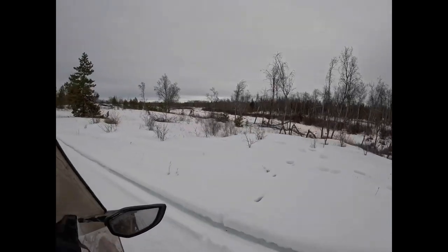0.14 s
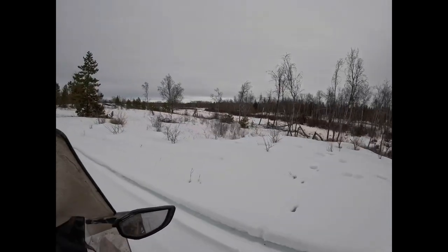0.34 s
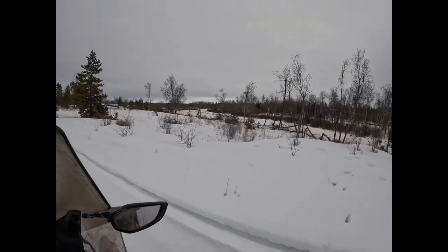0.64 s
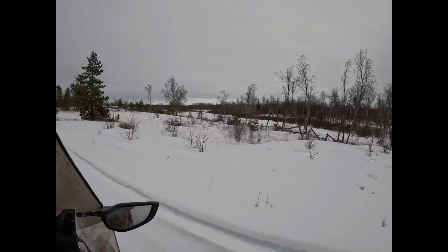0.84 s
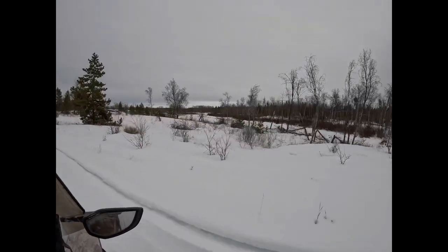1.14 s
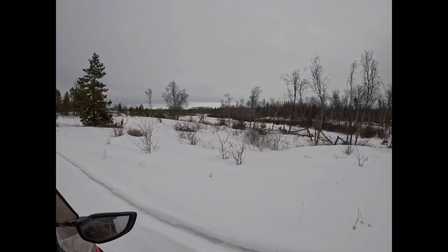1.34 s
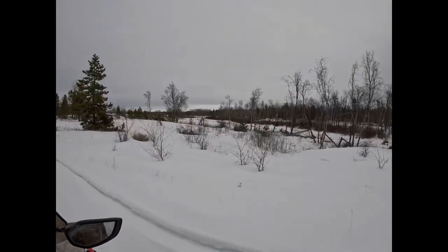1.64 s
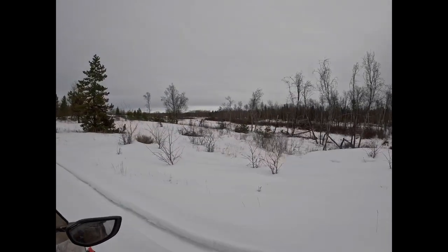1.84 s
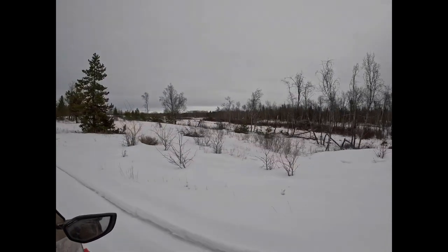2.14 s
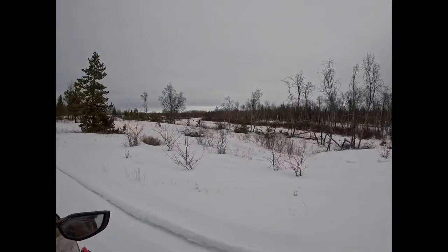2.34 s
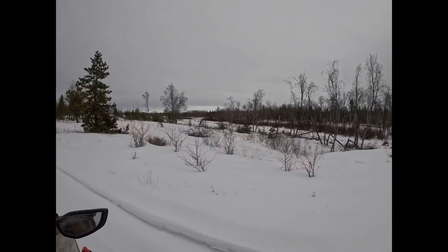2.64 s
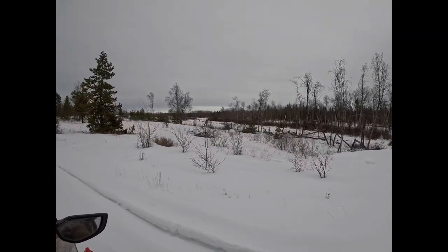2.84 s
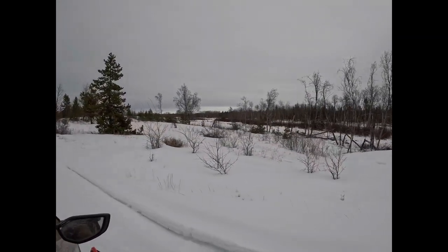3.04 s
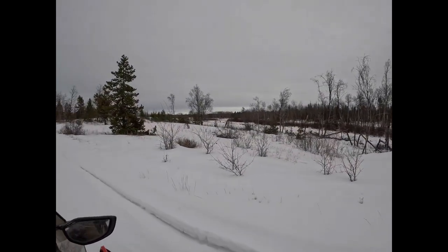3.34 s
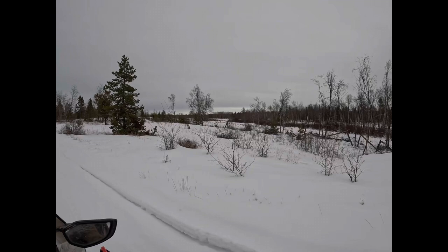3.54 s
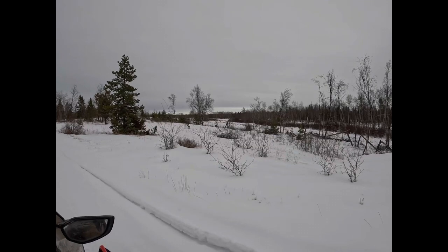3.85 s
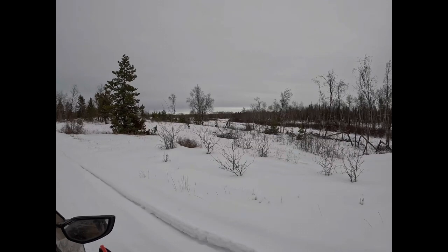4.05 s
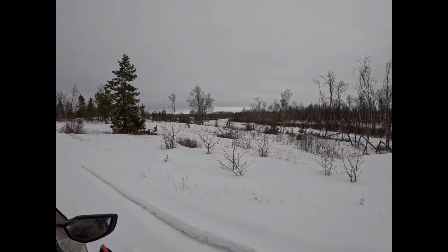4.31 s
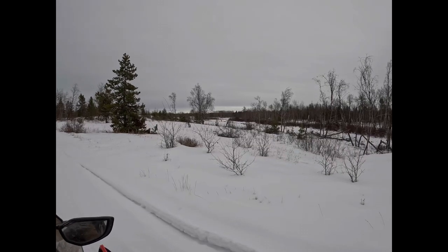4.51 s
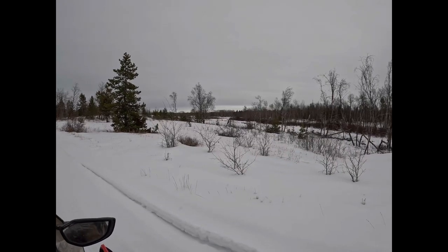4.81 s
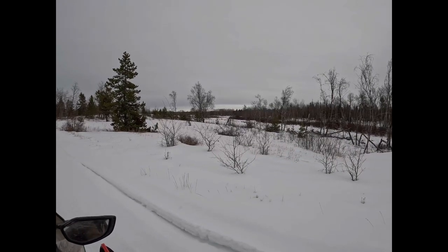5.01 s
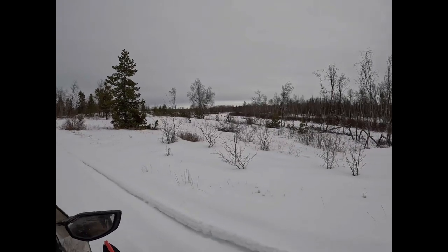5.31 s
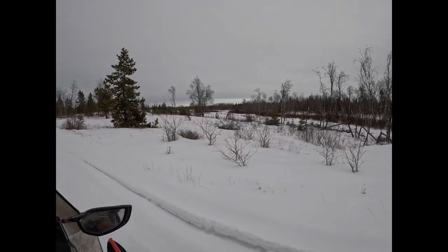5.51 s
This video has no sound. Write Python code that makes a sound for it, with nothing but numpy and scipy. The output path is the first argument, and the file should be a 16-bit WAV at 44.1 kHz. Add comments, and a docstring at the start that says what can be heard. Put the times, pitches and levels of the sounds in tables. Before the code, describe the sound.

A snowmobile pulls along a snowy trail, heard close from the seat in open air. Its buzzing, clattering engine rises slightly over the low rumble of the track, with faint belt squeals. The pitch then falls steadily to a lumpy, rattling idle. A switch snaps sharply and the engine runs down in ever slower thumps, with loose knocks, a few thin clinks and a last soft rustle.

```python
"""On a snowy trail, from the seat of a snowmobile: it pulls along, eases off and settles to idle.
The exhaust drones through the pipe's resonances, the engine clatters once a firing, the belt squeals
on the clutch and the track rumbles over the snow. The stop switch snaps and the engine runs down
in ever slower thumps, with loose knocks, a few thin clinks and a last short rustle."""
import sys
import numpy as np
from scipy import signal
from scipy.fft import rfft, irfft
from scipy.io import wavfile
from scipy.ndimage import uniform_filter1d

SR = 44100
rng = np.random.default_rng(int(sys.argv[2]) if len(sys.argv) > 2 else 0)


def wrap_up_sound(samples):
    """Save the sound to the file named by the first command line argument, as 16-bit audio."""
    columns = np.atleast_2d(samples).T
    # keep every value between -1 and 1, then stretch to whole-number steps
    tamed = np.clip(columns, -1, 1)
    steps = np.round(tamed * 32767).astype(np.int16)
    wavfile.write(sys.argv[1], SR, steps)


N = 250047
TIME = np.arange(N) / SR
IDLE_RATE, ENGAGE_RATE = 34, 56.5  # firings per s: the belt hangs slack; the belt grips
STOP_S, COAST_S = 4.7866, 4.838  # the stop switch snaps; the first unfired stroke
# cowl resonances: (centre [Hz], width [Hz], lift [dB])
COWL_MODES = [(1330, 97, 1.5), (1690, 150, 2.5), (2506, 180, -4), (3440, 190, 5), (4000, 620, 2.5)]


def exhaust(rate, firings, flutter_per_s=45, fade_db_per_s=52.5, hold_s=.033):
    """Orders of the firing rate slide through pipe resonances; unequal cylinders add half orders."""
    # pipe and air box resonances: (centre [Hz], width [Hz], throttle shut [dB], throttle open [dB])
    pipe = [(70, 35.4, -20, -49), (110, 24, -22.5, -30.5), (146, 28, -34.5, -42), (172, 15.4, -43, -17),
            (204.5, 38, -37.5, -31.5), (285.8, 45.5, -32, -28.5), (324, 26, -37, -24.5),
            (395, 66, -37.5, -39.5), (456, 52.4, -40, -26), (579.6, 49.7, -63, -43),
            (635, 45, -63.5, -35.5), (788, 110, -65, -50), (934, 55, -58, -40.5), (1051, 38, -70.5, -34),
            (1270, 190, -75, -39), (1446, 58, -79, -39), (1715, 140, -74, -46.5), (2215, 130, -81, -49),
            (2400, 110, -81, -55), (2860, 400, -76, -58), (3400, 300, -78, -59)]
    # low orders of the exhaust pulse: (order [x firing rate], throttle shut [dB], throttle open [dB])
    pulse_orders = [(1.5, -12.5, -4.5), (2.0, 1, -4.5), (2.5, -31.5, 6), (3.0, 4.5, -3.5), (3.5, -7.5, -8),
                    (4.0, -4, 5), (4.5, -14, 0.5), (5.0, 0, -1), (5.5, -11, -23), (6.0, -1, 3.7),
                    (6.5, -23.5, 0.5), (7.0, 2.7, 7.5), (7.5, -32.5, -8), (8.0, 4, 5), (8.5, -30, 2),
                    (9.0, 3, 6), (9.5, -19, -5.5), (10.0, 1.5, -5)]
    # the seventh order sings out as the revs fall: (time [s], half length [s], added share [dB])
    singing = [(2.13, 0.12, -3.5)]
    t = TIME[::100]  # control rate
    throttle, rate = opening(t), np.interp(t, TIME, rate)
    centre, width, shut_db, open_db = np.array(pipe).T[:, :, None]
    trim_db = -.28 - 1.4 * throttle
    peaks = from_db(shut_db + throttle * (open_db - shut_db) + trim_db)
    pulse_db = {order: shut + throttle * (wide - shut) for order, shut, wide in pulse_orders}
    buzz_db, half_order_db = 4.5 * throttle, -17.5 + 5 * throttle
    fade_db = fade_db_per_s * np.maximum(t - COAST_S - hold_s, 0)
    rough = .1 + .22 * np.sin(np.pi * throttle)  # combustion is least even at half throttle
    out = np.zeros((2, N))
    for order in np.r_[.5, np.arange(1.5, 30, .5)]:
        hz = order * rate
        response = 1 / (1 + 1j * (hz ** 2 - centre ** 2) / (hz * width))
        order_db = pulse_db.get(order, buzz_db * (order > 10) + half_order_db * (order % 1 > 0))
        gain = np.linalg.norm(peaks * np.abs(response) ** 2, axis=0) * from_db(order_db)
        if order == 7:
            gain *= 1 + np.interp(t, TIME, swells(singing))
        gain *= from_db(-fade_db * (1 + (hz / 450) ** 4))  # coasting, the highs fade faster
        gain *= 1 - (1 - burning(t)) / (1 + (hz / 100) ** 10)  # the bass dies with the ignition
        # uneven combustion shakes each order in strength and timing
        gain *= 1 + rough * drift(flutter_per_s, t)
        lag = np.angle(response).sum(axis=0) + rough * drift(flutter_per_s, t)
        tone = np.sqrt(2) * np.cos(2 * np.pi * order * firings + np.interp(TIME, t, lag))
        out += tone * np.array([np.interp(TIME, t, gain * side) for side in pan(hz)])
    return out


def boom(rate, firings, box_hz=69.5, width_hz=20.7, box_db=-16):
    """The firing tone swells under throttle and at idle, and booms through the air box resonance."""
    firing_db = -31 + 10.5 * opening() + 7.5 * belt_slack(rate)
    air_box = from_db(box_db) / (1 + (2 * (rate - box_hz) / width_hz) ** 2)
    return burning() * (from_db(firing_db) + air_box) * np.sqrt(2) * np.cos(2 * np.pi * firings)


def clatter(rate, firings, split_hz=3700, scatter_db=1.47):
    """Pistons and valves shake the cowl once a firing, one cylinder harder than the other."""
    # clatter colour under load: (frequency [Hz], level [dB])
    loaded = [(320, -32), (530, -0.5), (649, -5.5), (867, -5.5), (1070, -3), (1110, -1.5), (1460, -6.5),
              (1590, -18), (1950, -7), (2100, -12.5), (2500, -14.5), (3440, -21), (5570, -26.5),
              (7640, -27), (12600, -46.5), (14800, -54)]
    # clatter colour at idle: (frequency [Hz], level [dB])
    idle = [(320, -39), (550, 0.5), (830, -2), (1170, -0.5), (1290, -4), (1500, -3), (1880, -10.5),
            (2010, -6), (2180, -12), (2540, -7), (3120, -15), (4780, -16.5), (5490, -20.5), (7800, -23),
            (8200, -28), (12400, -37), (14800, -63)]
    throttle, octaves = opening(), np.log2(rate / IDLE_RATE)
    unloaded_db = -2.5 * belt_slack(rate) - 4 * (1 - burning())
    body_db = -41 + 2 * octaves + 8 * throttle ** 2 + unloaded_db
    treble_db = -56.5 + 1.5 * np.minimum(octaves, 0) + 14 * throttle ** 2 + unloaded_db
    hiss = np.sqrt(throttle) * noise(loaded, COWL_MODES)
    hiss += np.sqrt(1 - throttle) * noise(idle, COWL_MODES)
    body = signal.sosfiltfilt(signal.butter(4, split_hz, fs=SR, output="sos"), hiss)
    treble = hiss - body
    turn = 2 * np.pi * (firings + .21)
    beat = rms_one(np.exp(.12 * np.cos(turn)) * (1 + .038 * np.cos(turn / 2)))
    depth = np.clip(.11 + np.maximum(1 - rate / IDLE_RATE, 0), 0, 1)  # slow strokes throb more
    throb = rms_one((1 - depth + depth * beat) * from_db(scatter_db * drift(160)))
    rattle = from_db(body_db) * rms_one(body) + from_db(treble_db) * rms_one(treble)
    return throb * compression(rate) * rattle


def firing_rate(coast_rate=40.3, decay_s=.335):
    """Strokes per second; without ignition, friction slows the crank exponentially."""
    # revs under ignition: (time [s], rate [firings/s])
    revs = [(0, 106.78), (0.12, 106.93), (0.34, 107.28), (0.51, 114.2), (0.69, 118.43), (0.88, 116.37),
            (1, 113.02), (1.15, 96.44), (1.31, 90.04), (1.48, 86.08), (1.62, 81.58), (1.75, 76.92),
            (1.88, 71.34), (2.05, 67.77), (2.17, 66.13), (2.3, 59.93), (2.43, 56.89), (2.6, 51.84),
            (2.79, 46.32), (2.98, 44.15), (3.14, 41.81), (3.5, 41.78), (3.77, 40.14), (4.28, 41.82),
            (4.6, 41.61), (4.8, 41.21)]
    coasting = coast_rate * np.exp((COAST_S - TIME) / decay_s)
    return np.where(TIME < COAST_S, in_time(revs), coasting)


def crank(rate, waver_per_s=14):
    """Running count of firings; the crank wavers early and late, most at half throttle."""
    firings = np.cumsum(rate) / SR
    depth = .008 + .025 * np.sin(np.pi * opening())
    waver = depth * uniform_filter1d(drift(waver_per_s), SR // 25)
    # the first unfired stroke falls on a half count
    return firings - np.interp(COAST_S, TIME, firings) - .5 + burning() * waver


def opening(t=TIME):
    """The rider pulls, opens up, eases off and lets it idle."""
    # throttle moves: (time [s], opening [0-1])
    throttle = [(0, 0.89), (.33, 0.93), (.5, 0.99), (.97, 0.97), (1.1, 0.77), (1.4, 0.67), (1.83, 0.54),
                (2.12, 0.3), (2.5, 0.06), (3.1, 0.02)]
    return in_time(throttle, t)


def burning(t=TIME):
    """One while the engine fires, falling to zero just after the stop switch."""
    return np.interp(t - STOP_S, [.02, .11], [1, 0])


def low_revs(rate):
    """Zero at driving revs, rising toward one as the engine nears idle."""
    return np.clip((ENGAGE_RATE - rate) / (ENGAGE_RATE - IDLE_RATE), 0, 1)


def belt_slack(rate):
    """Rises toward idle; zero once the clutch grips or the ignition is off."""
    return low_revs(rate) * burning()


def compression(rate, stall_rate=11.5):
    """One at speed, fading as the crank stalls."""
    return 1 / np.sqrt(1 + (stall_rate / rate) ** 6)


def run_down(box_hz=70, box_decay_s=.032, pipe_hz=125, pipe_decay_s=.033, rise_s=.011, gulp_s=.004):
    """Each unfired stroke gulps air and leaves the air box and, more softly, the pipe ringing."""
    # compression thumps: (time [s], level [dB])
    thumps = [(4.842, -19), (4.871, -14.5), (4.897, -10), (4.93, -12), (4.963, -7.5), (5.002, -10),
              (5.041, -8.5), (5.089, -8.5), (5.14, -8), (5.201, -9), (5.288, -10), (5.406, -13.5),
              (5.55, -22)]
    pipe_gain, gulp_gain = from_db(-14), from_db(-11)
    out = np.zeros(N)
    for s, db in thumps:
        near = np.abs(TIME - s) < .5
        age = TIME[near] - s
        attack = np.exp(-(np.minimum(age, 0) / rise_s) ** 2)
        after = np.maximum(age, 0)
        box = np.exp(-after / box_decay_s) * np.cos(2 * np.pi * box_hz * age)
        pipe = pipe_gain * np.exp(-after / pipe_decay_s) * np.sin(2 * np.pi * pipe_hz * age)
        gulp = gulp_gain * np.exp(-(age / gulp_s) ** 2)
        out[near] -= from_db(db) * (attack * (box + pipe) + gulp) / (1 + gulp_gain)
    return out


def ride(track_db=-23.5, buffet_db=-21):
    """Track rumble and low buffeting grow with the sled's speed, with brief surges on top."""
    # the sled's pace: (time [s], share of full speed [0-1])
    ground_speed = [(0, 0.84), (1.15, 0.97), (1.8, 0.79), (2.2, 0.27), (3.1, 0.36), (4.8, 0.38), (5.1, 0.1),
                    (5.67, 0.036)]
    # bumps, then a low knock and the low body of the last rustle:
    # (time [s], half length [s], rumble [dB], buffeting [dB])
    surges = [(0.213, 0.16, -36, -20), (0.755, 0.054, -42, -28), (1.018, 0.14, -29.5, -26),
              (1.514, 0.31, -46.5, -38), (3, 0.13, -32.5, -58), (5.404, 0.017, -41.5, -33),
              (5.535, 0.069, -50.5, -30.5)]
    # colour of the track on snow: (frequency [Hz], level [dB])
    track_colour = [(25, 9.5), (60, -1), (110, -6), (165, 8), (220, 3.5), (290, 7.5), (360, -2), (450, 2),
                    (540, -21.5), (800, -17), (2000, -60.5)]
    # colour of the buffeting: (frequency [Hz], level [dB])
    buffet_colour = [(12, -14.5), (28, -2.5), (48, 3.5), (68, 12.5), (85, 2), (110, 6.5), (200, -38),
                     (600, -78.5)]
    speed = in_time(ground_speed)
    s, half_s, track_surge_db, buffet_surge_db = np.transpose(surges)
    track = from_db(track_db) * speed + swells(zip(s, half_s, track_surge_db))
    buffet = from_db(buffet_db) * speed ** 4.1 + swells(zip(s, half_s, buffet_surge_db))
    return track * noise(track_colour) + buffet * noise(buffet_colour)


def drive_chatter(rate, firings, ring_db=-30, crack_db=-42, crack_decay_s=.007, jitter_s=.00033):
    """Near idle the unloaded drive knocks in a set pattern: dry cracks and the clutch's short ring."""
    # knocks in each two-firing cycle: (place [firings], crack [dB], ring [dB])
    pattern = [(.35, -5, -14), (.47, -7, -20), (.57, -6, -8), (.77, -11, -18), (1.36, 0, -4), (1.56, -4, 0)]
    # colour of the crack: (frequency [Hz], level [dB])
    crack_colour = [(500, -22), (1100, -5), (2500, -1.5), (4600, -9.5), (5600, -12), (7800, -9),
                    (8200, -22), (10000, -23), (12000, -31), (15000, -45)]
    # the clutch's ringing modes: (pitch [Hz], level [dB], time to fall 60 dB [s])
    modes = [(966, -12, .035), (1100, -4, .028), (1285, -.5, .045), (1430, -8, .03), (1620, -9, .025),
             (1760, -8.5, .035), (2010, -8.5, .04), (2350, -14, .03), (2560, -12, .02), (3350, -12, .018),
             (4040, -18, .02), (4780, -17, .016)]
    cracks, knocks = np.full((2, N), 1e-18)
    slack = belt_slack(rate)
    for place, sharp_db, body_db in pattern:
        cycle = (firings - place + jitter_s * rate * drift(40)) // 2
        hits = np.flatnonzero(np.diff(cycle))
        strength = slack[hits] * from_db(.5 * rng.standard_normal(len(hits)))
        cracks[hits] += strength * from_db(sharp_db)
        knocks[hits] += strength * from_db(body_db)
    crack_power = signal.lfilter([1], [1, -np.exp(-2 / (crack_decay_s * SR))], cracks ** 2)
    out = from_db(crack_db) * np.sqrt(crack_power) * noise(crack_colour, COWL_MODES)
    for k, (hz, db, t60) in enumerate(modes):
        radius, angle = from_db(-60 / (t60 * SR)), 2 * np.pi * hz / SR
        ring = signal.lfilter([0, np.sin(angle)], [1, -2 * radius * np.cos(angle), radius ** 2], knocks)
        # neighbouring modes start in opposite directions, which softens the attack
        out += (-1) ** k * from_db(ring_db + db) * ring * pan(hz)
    return out


def belt_squeal(ring_hz=1972, width_hz=30, steady=.8, shake=.6):
    """The clutch sheaves sing in a narrow band while the belt slips."""
    # squeals: (time [s], half length [s], level [dB])
    squeals = [(.2, 0.11, -42), (.92, .15, -46), (1.54, .09, -41), (1.75, .08, -43)]
    turn = 2 * np.pi * ring_hz * TIME
    tone = (steady + shake * drift(width_hz)) * np.cos(turn) + shake * drift(width_hz) * np.sin(turn)
    return swells(squeals) * tone * pan(ring_hz)


def injector(firings, place=.926, half_length_s=.001):
    """A fine metallic tick every second firing while the sled overruns the engine."""
    # swell of the ticking: (time [s], half length [s], level [dB])
    overrun = [(1.95, 0.33, -39.5)]
    # colour of the tick: (frequency [Hz], level [dB])
    colour = [(1500, -10), (2500, -7), (3300, 11), (4300, -8), (5500, -9), (7500, -15), (9200, -6.5),
              (10400, -18.5), (11500, -30), (15000, -45)]
    from_tick_s = ((firings - place + 1) % 2 - 1) / (np.gradient(firings) * SR)
    strength = swells(overrun) * from_db(-.5 * drift(35.2))
    return strength / (1 + (from_tick_s / half_length_s) ** 4) * noise(colour)


def valves(rate, firings, place=.27, decay_s=.0054, level_db=-60, weak_db=-8):
    """At low revs the valve gear jingles once a firing, one cylinder more softly."""
    # colour of the jingle: (frequency [Hz], level [dB])
    colour = [(6000, -30), (7800, -6), (8300, -18), (9500, -9), (10200, 0), (10500, -22), (12000, -18),
              (14000, -40)]
    age = (firings - place) % 1 / rate
    weak = (firings - place) % 2 < 1
    strength = low_revs(rate) * compression(rate) ** 14 * from_db(level_db + weak_db * weak)
    return strength * np.exp(-age / decay_s) * noise(colour)


def stop_switch():
    """Three contacts in quick succession make one sharp snap."""
    # switch contacts: (time [s], level [dB], decay [s])
    contacts = [(4.7866, -33, .0006), (4.7875, -16, 0.0019), (4.7894, -23.5, 0.0038)]
    # colour of the snap: (frequency [Hz], level [dB])
    colour = [(500, -33), (760, -14), (980, 3), (1250, 2.5), (1500, .5), (2050, 2), (2600, -2.5),
              (3200, -5), (3850, 1), (4800, -4), (5400, -14), (6000, -4), (7300, -13), (8400, -10),
              (12000, -35), (15000, -46)]
    return bursts(contacts) * noise(colour)


def loose_knocks():
    """The drive knocks loosely as the engine runs down."""
    # knocks: (time [s], level [dB], decay [s])
    knocks = [(4.837, -45, 0.01), (4.886, -43, 0.017), (4.933, -42.5, 0.013), (4.965, -38, 0.024),
              (5.006, -41, 0.011), (5.044, -41.5, 0.016), (5.069, -42, .008), (5.097, -37.5, 0.0065),
              (5.124, -46, .008), (5.154, -43, 0.0092), (5.177, -43, .009), (5.204, -48, .008),
              (5.227, -44, 0.0078), (5.253, -41.5, 0.0084), (5.279, -45, 0.0087), (5.365, -47, 0.015),
              (5.393, -44, 0.012)]
    # their colour: (frequency [Hz], level [dB])
    colour = [(300, -23), (600, -1), (1300, 1), (1800, 0.5), (2200, 0), (3000, -10), (4500, -10),
              (5500, -18.5), (7500, -19), (9000, -40), (14000, -55)]
    return bursts(knocks) * noise(colour)


def clinks(attack_s=.0025, decay_s=.0074):
    """Loose metal parts ring briefly as the engine shudders to a stop."""
    # metal pings: (time [s], level [dB], pitch [Hz])
    pings = [(5.007, -38.5, 4030), (5.099, -42, 4000), (5.155, -38, 4000), (5.227, -39, 4000),
             (5.282, -51, 3150), (5.317, -56, 1420), (5.366, -49, 4000), (5.411, -49, 2750),
             (5.549, -54, 2230), (5.576, -48, 1090), (5.619, -50, 2170), (5.657, -49, 1130)]
    out = np.zeros((2, N))
    for s, db, hz in pings:
        near = (TIME > s) & (TIME < s + .5)
        age = TIME[near] - s
        envelope = np.minimum(age / attack_s, 1) * np.exp(-np.maximum(age - attack_s, 0) / decay_s)
        out[:, near] += from_db(db) * envelope * np.sin(2 * np.pi * hz * age) * pan(hz)
    return out


def rustle(start_s=5.476, attack_s=.005, hold_s=.044, release_s=.0078):
    """A quick brush with a faint tail as the engine all but stops, over a constant bed of hiss."""
    # colour of brush and hiss: (frequency [Hz], level [dB])
    colour = [(290, -22), (500, 1), (838, -4.5), (1020, 3), (1550, -7), (2220, -5), (4340, -11.5),
              (5660, -6.5), (10300, -21.5), (14000, -41.5)]
    brush_db, tail_db, hiss_db = -50.5, -60.5, -73
    age = TIME - start_s
    attack = np.clip(age / attack_s, 0, 1)
    brush = from_db(brush_db) * np.exp(-np.maximum(age - hold_s, 0) / release_s)
    return (from_db(hiss_db) + attack * (brush + from_db(tail_db))) * noise(colour)


def noise(colour, resonances=()):
    """Coloured stereo noise with optional resonant humps; unit power in the middle."""
    # how alike the two sides are: (frequency [Hz], likeness [0-1])
    likeness = [(30, .995), (75, .998), (150, .985), (300, .985), (700, .92), (1400, .95), (2800, .91),
                (5500, .87), (9000, .66), (14000, .8)]
    hz = np.arange(N // 2 + 1) * SR / N
    humps_db = sum(lift / (1 + (2 * (hz - centre) / width) ** 2) for centre, width, lift in resonances)
    alike = at_hz(likeness, hz)
    mid, side = rfft(rng.standard_normal((2, N)))
    pair = np.sqrt(1 + alike) * mid + np.sqrt(1 - alike) * side * [[1], [-1]]
    out = irfft(pair * from_db(at_hz(colour, hz) + humps_db) * pan(hz), N)
    return out / np.std(out.mean(axis=0))


def pan(hz):
    """Left and right gains: the engine's treble comes from the left."""
    # stereo balance: (frequency [Hz], left minus right [dB])
    balance = [(30, 0), (300, 0), (480, 0.6), (750, 4.5), (1300, 5.5), (2400, 7), (5000, 2.33),
               (12000, 3.5)]
    gains = from_db(np.multiply.outer([.5, -.5], np.atleast_1d(at_hz(balance, hz))))
    return gains / gains.mean(axis=0)


def bursts(rows):
    """Envelope of sudden contacts that die away."""
    return sum(from_db(db) * (TIME >= s) * np.exp(-np.abs(TIME - s) / decay) for s, db, decay in rows)


def swells(rows):
    """Envelope of sounds that rise, hold and fall away."""
    return sum(from_db(db) * np.exp(-((TIME - s) / half_s) ** 4) for s, half_s, db in rows)


def drift(per_s, t=TIME):
    """Random wander around zero, with a spread of about one."""
    knots = np.arange(0, TIME[-1] + 1, 1 / per_s)
    return np.interp(t, knots, rng.standard_normal(len(knots)))


def in_time(points, t=TIME):
    """Join timed points with straight lines."""
    return np.interp(t, *np.transpose(points))


def at_hz(points, hz):
    """Read a spectrum on a log-frequency axis."""
    knots_hz, values = np.transpose(points)
    return np.interp(np.log(np.maximum(hz, 1)), np.log(knots_hz), values)


def from_db(db):
    """Decibels to gain."""
    return 10 ** (np.asarray(db) / 20)


def rms_one(x):
    """Scale to unit power."""
    return x / np.sqrt(np.mean(x ** 2) + 1e-20)


def scene():
    """Engine, ride and shut-down in open air."""
    rate = firing_rate()
    firings = crank(rate)
    drone = exhaust(rate, firings) + boom(rate, firings)
    mechanics = clatter(rate, firings) + injector(firings) + valves(rate, firings)
    drive = belt_squeal() + drive_chatter(rate, firings)
    shut_down = stop_switch() + run_down() + clinks() + loose_knocks()
    return drone + mechanics + drive + shut_down + ride() + rustle()


def record(dry):
    """The microphone drops the deepest rumble; the top is cut steeply."""
    low_cut = signal.butter(1, 10, "high", fs=SR, output="sos")
    high_cut = signal.ellip(10, .1, 80, 15000, fs=SR, output="sos")
    return signal.sosfilt(high_cut, signal.sosfilt(low_cut, dry))


dry = scene()
out = record(dry)
wrap_up_sound(out)
```